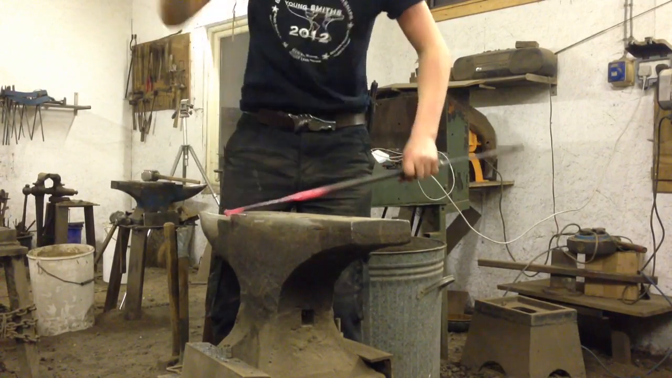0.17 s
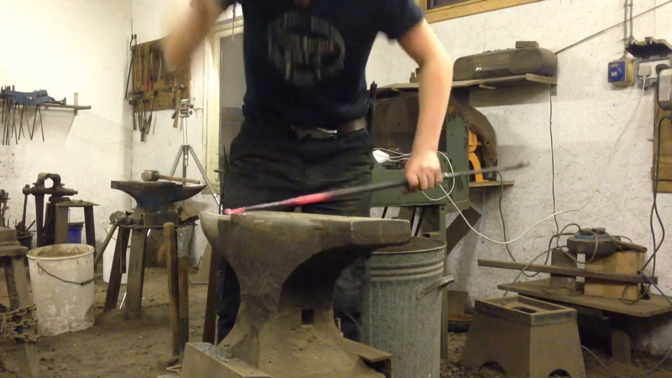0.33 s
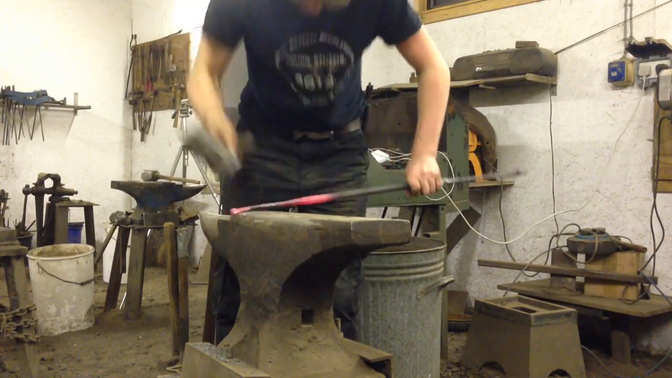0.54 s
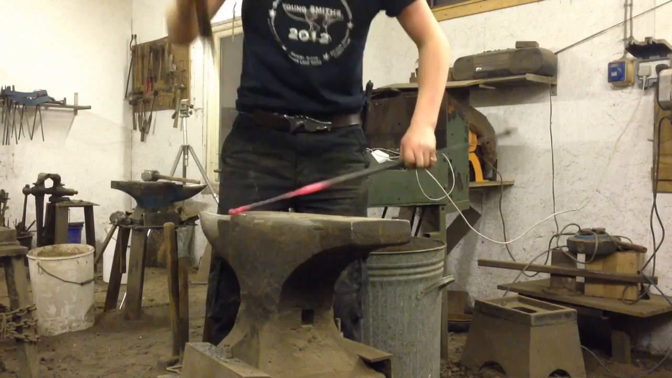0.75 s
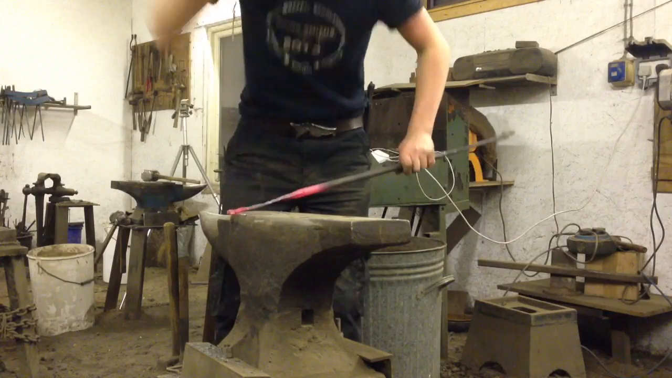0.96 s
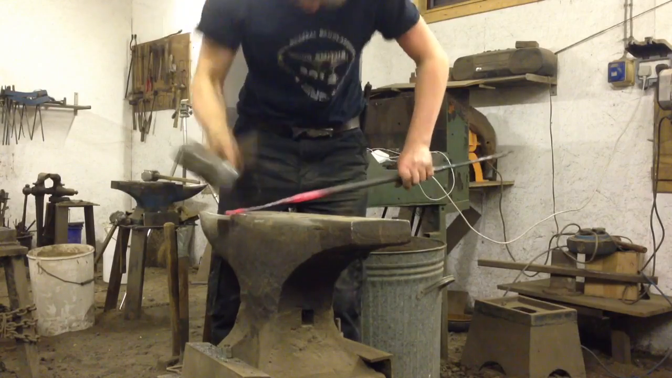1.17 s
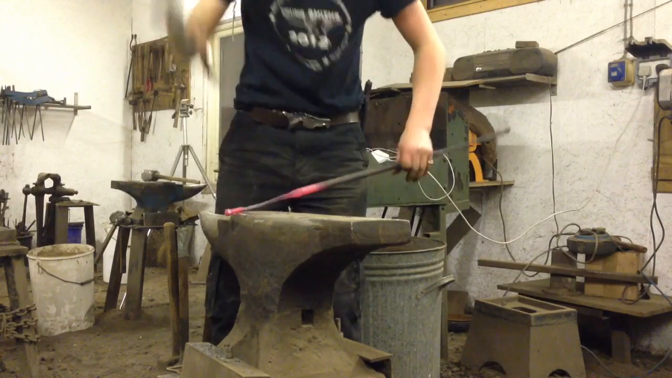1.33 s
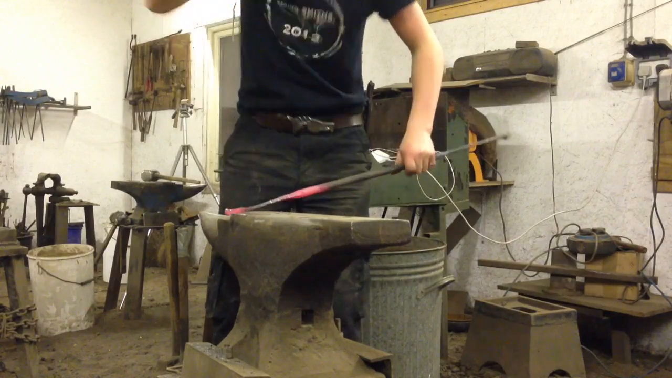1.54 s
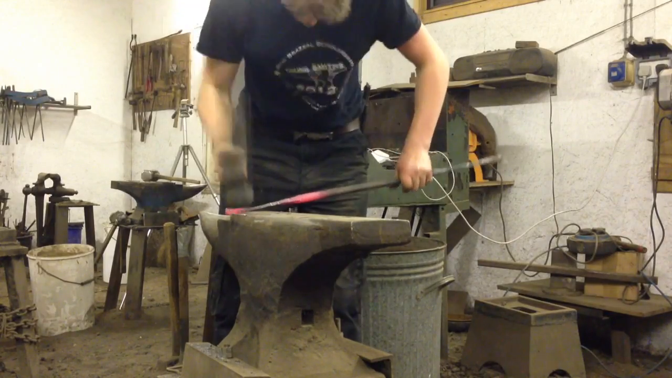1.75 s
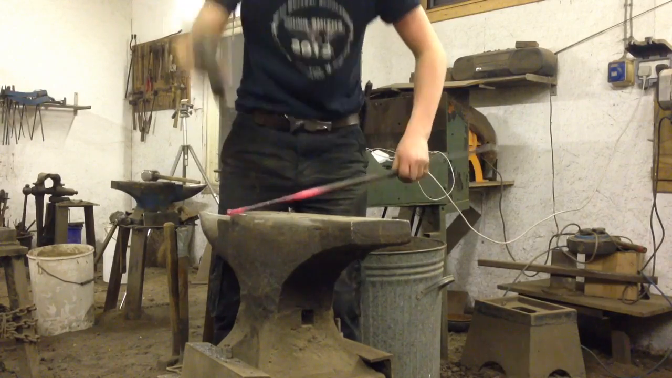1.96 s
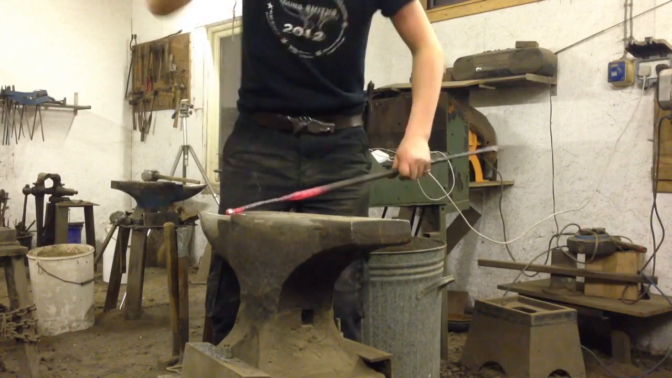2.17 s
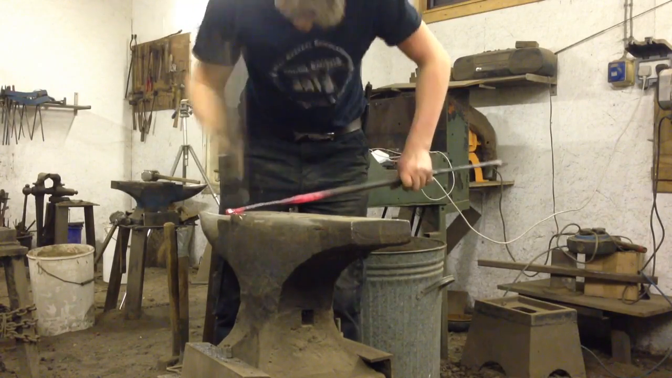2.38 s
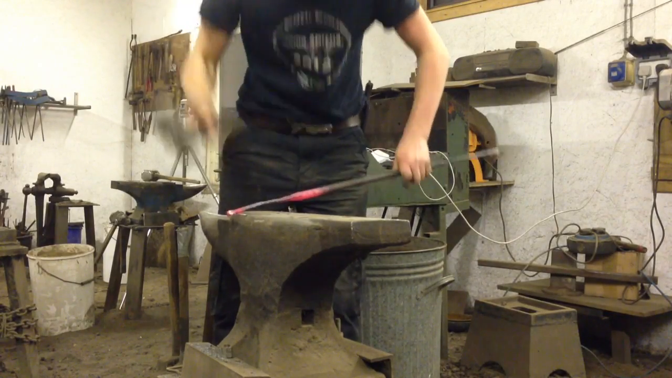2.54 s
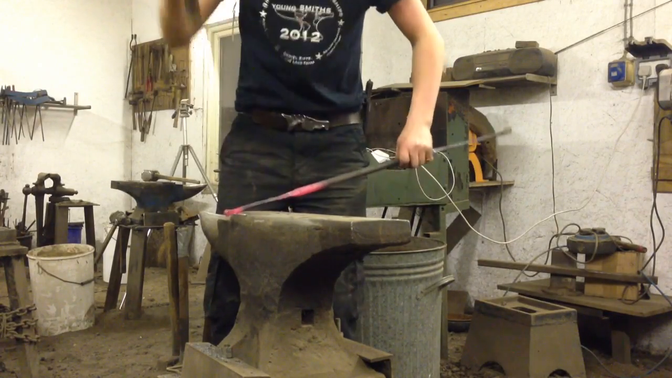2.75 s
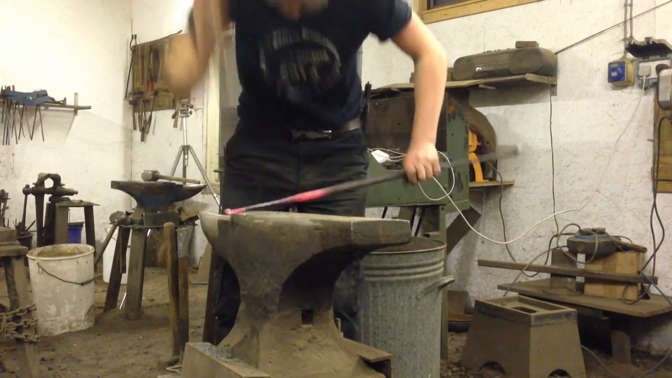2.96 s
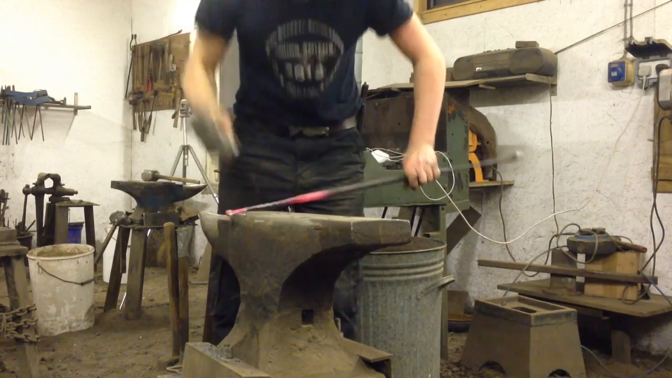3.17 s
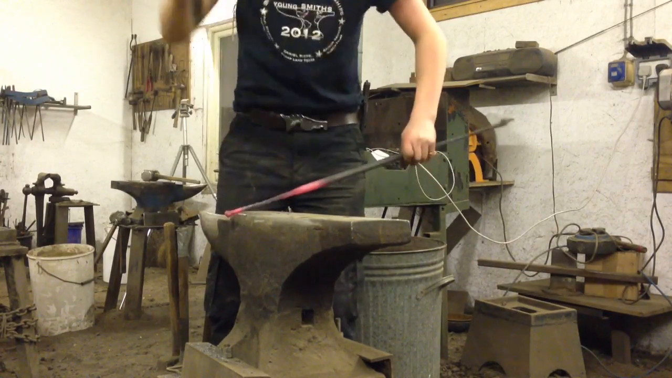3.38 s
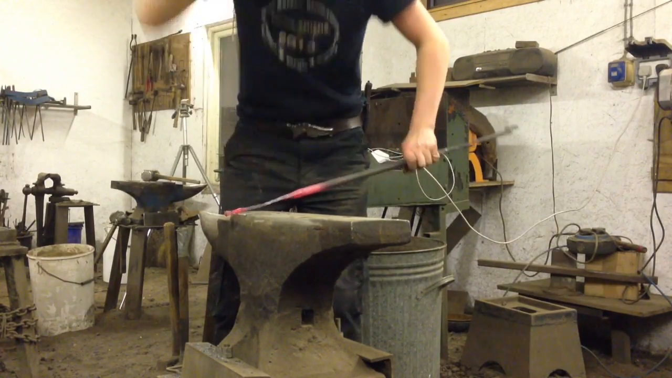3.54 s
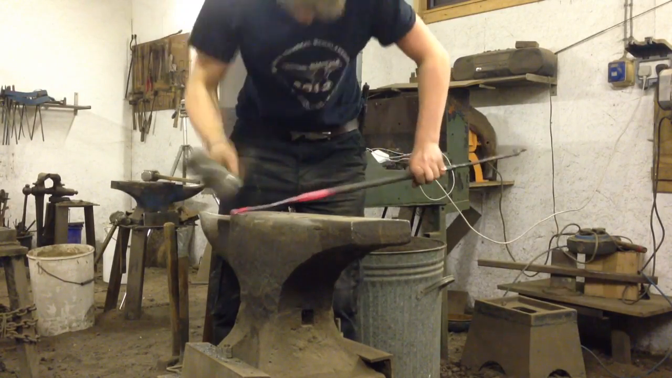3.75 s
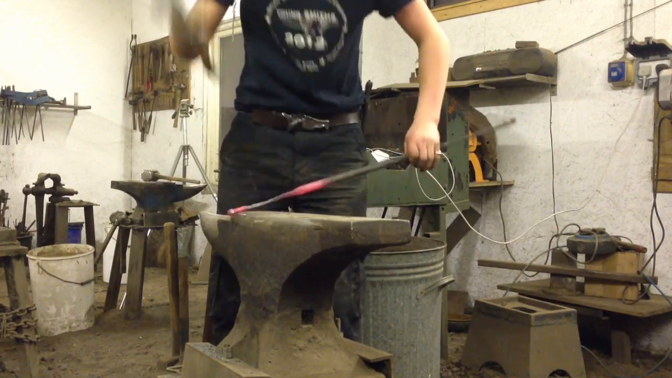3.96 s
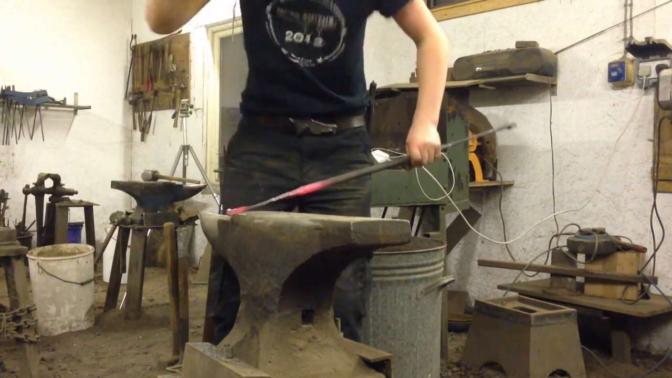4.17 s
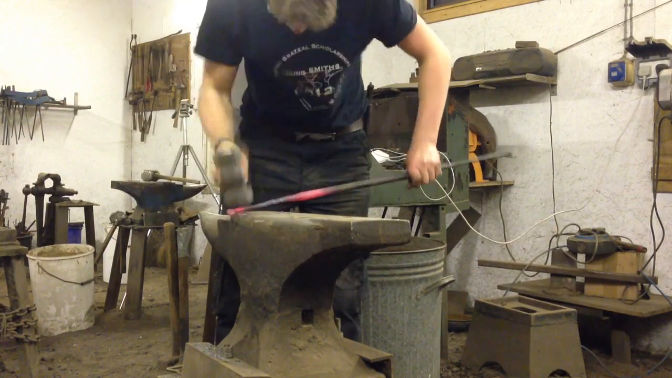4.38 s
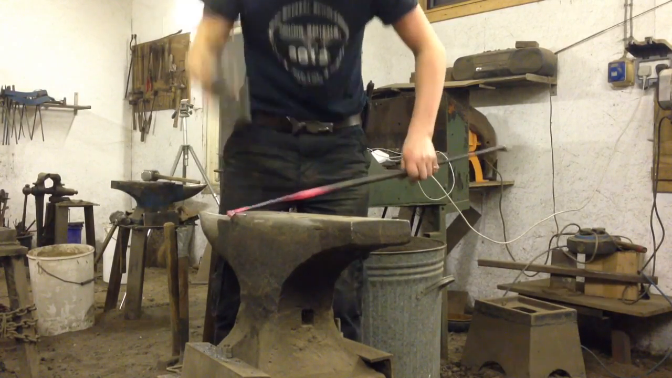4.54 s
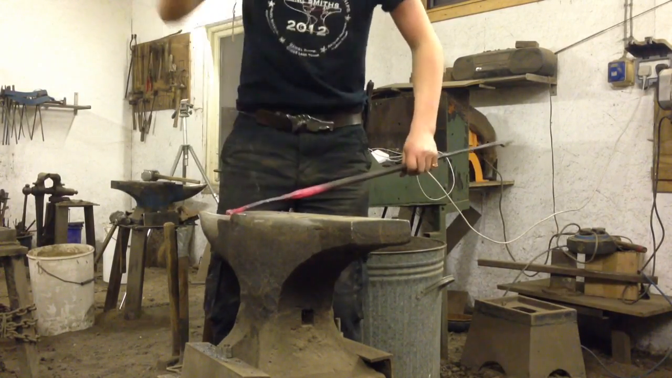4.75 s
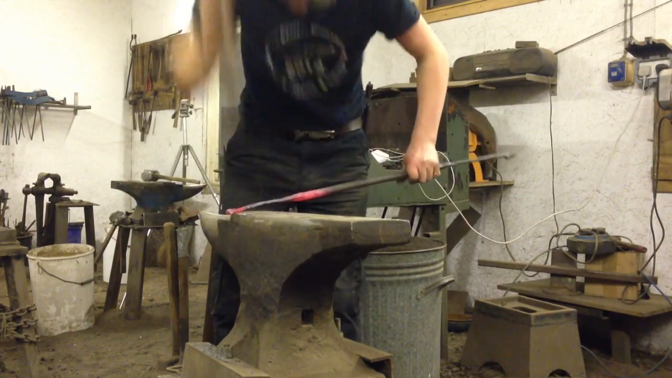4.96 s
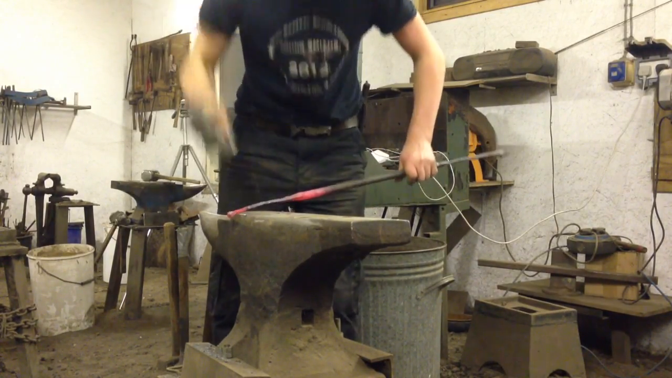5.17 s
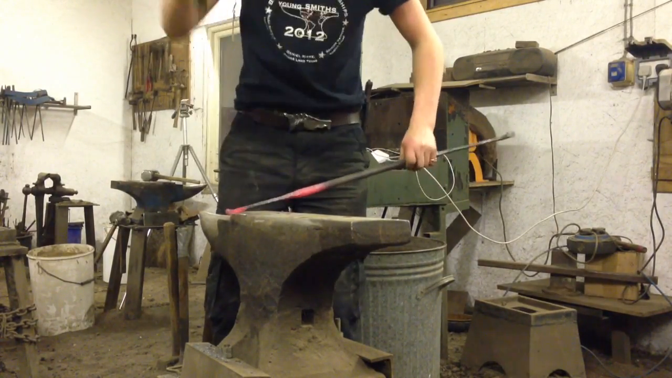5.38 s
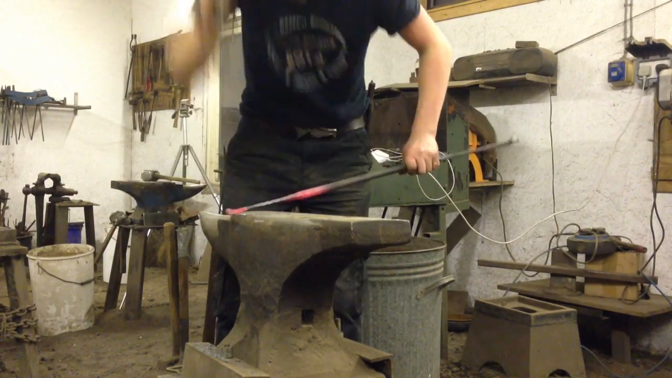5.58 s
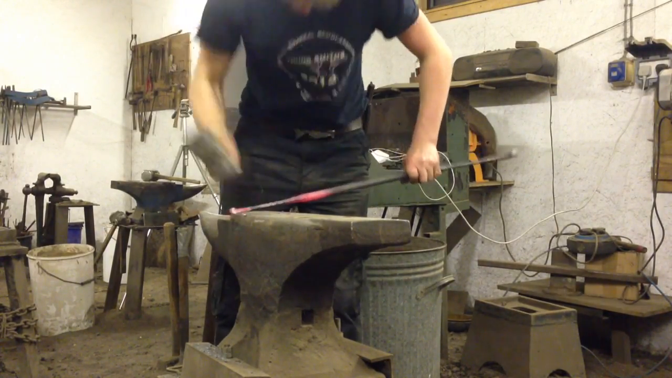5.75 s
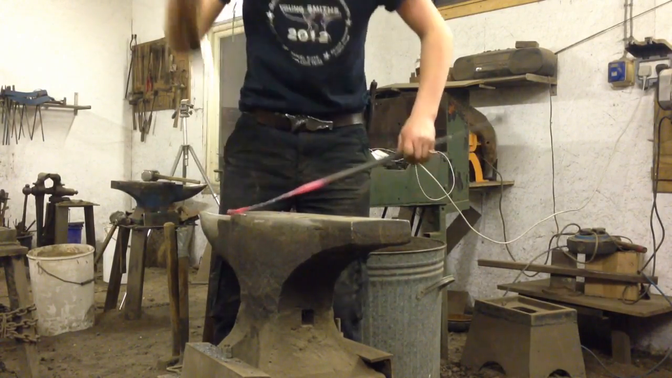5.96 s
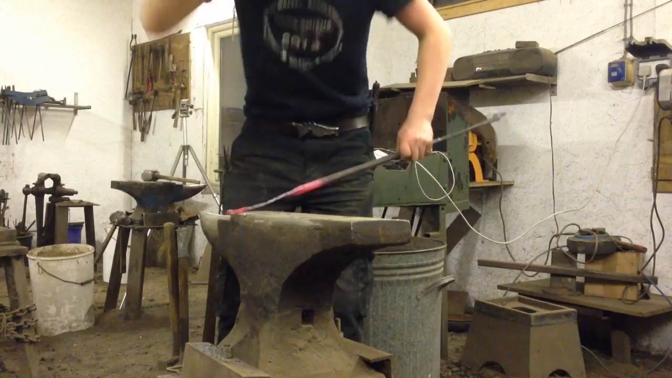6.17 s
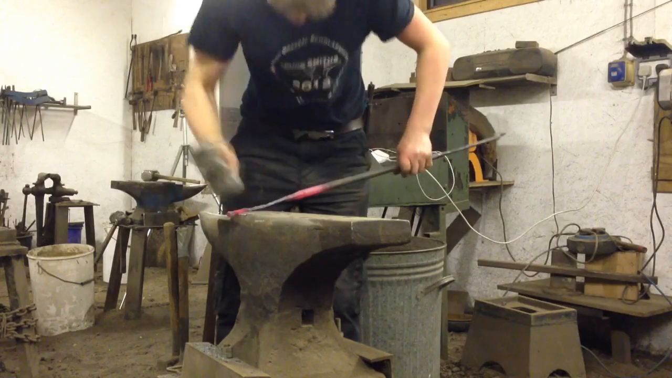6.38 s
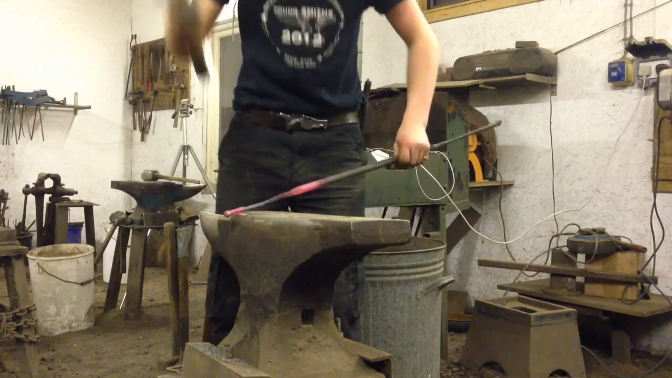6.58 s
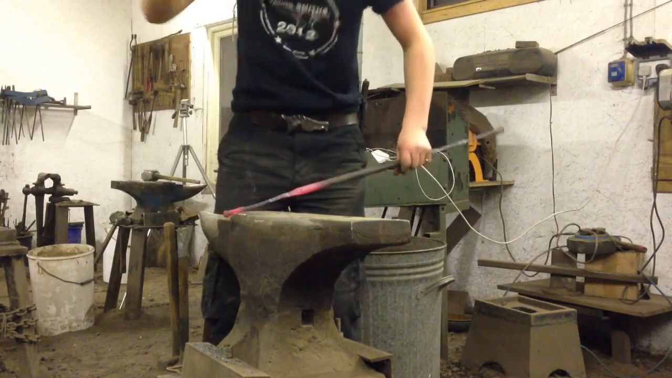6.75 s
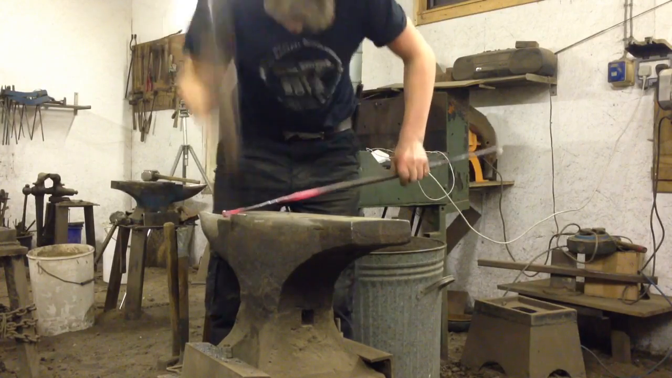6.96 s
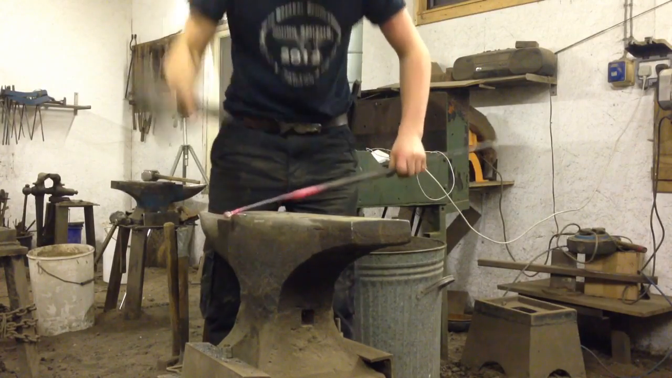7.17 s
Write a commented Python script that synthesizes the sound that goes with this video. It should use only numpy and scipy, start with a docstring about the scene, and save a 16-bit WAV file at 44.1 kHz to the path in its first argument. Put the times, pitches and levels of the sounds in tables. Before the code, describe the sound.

The sound opens on the fading ring of a hammer blow on an anvil in a small workshop. At about 0.6 seconds the next blow lands on the hot steel bar: a sharp crack, a dull clank and a short, bright metallic ring, with a brief echo from the walls. The blows continue evenly, one every two thirds of a second, at roughly 1.2, 1.9, 2.5, 3.2, 3.8, 4.5, 5.1, 5.8 and 6.4 seconds, with a last one at 7.1, right at the end. Their strength is similar, the one at 2.5 a little lighter, and the ring shifts in tone from hit to hit. In the gaps the bar and its scale tick faintly on the anvil, most clearly near 1.5 seconds. A very quiet rumble and hiss of forge fire and a blower's hum run underneath. Each hit sounds slightly compressed.

```python
"""A small workshop, a smith already hammering a hot steel bar on an anvil: we come in on a blow's tail.
Faint ticks and the hum and hiss of the forge fill the gap. Then the next blow lands: a crack, a dull
clank and a short ring that the soft steel damps, and the walls throw it back. Automatic gain flattens
each hit and creeps back up before the next. So it goes on to the end, a blow every two thirds of a second."""
import sys
import numpy as np
from scipy import signal
from scipy.fft import rfft, irfft, next_fast_len
from scipy.io import wavfile
from scipy.ndimage import uniform_filter1d

SR = 44100
rng = np.random.default_rng(int(sys.argv[2]) if len(sys.argv) > 2 else 0)


def transcribe(signal):
    """Save signal, clipped to [-1, 1], as a 16-bit WAV file at the path in sys.argv[1]."""
    frames = np.atleast_2d(signal).T
    limited = np.clip(frames, -1, 1)
    pcm = np.round(limited * 32767).astype(np.int16)
    wavfile.write(sys.argv[1], SR, pcm)


N = 318402
LEAD = SR // 4  # samples of pre-roll, room for the opening blow
AGE = np.arange(int(.6 * SR)) / SR  # seconds since a hit

# drift of the fire's rush: t/s, level/dB
FIRE_DRIFT = [(.3, -1), (1.65, 2), (2.3, 0), (3.6, -.5), (4.9, 1.9), (5.6, 2), (6.2, 0), (7.1, 0)]
# hum of the forge blower: f/Hz, level/dB
BLOWER_HUM = [(102, -66), (190, -68), (333, -68), (409, -73)]
# tone curves of the fire, a tick, the walls' echo and the contact crack: f/Hz, level/dB
FIRE_TONE = [(15, -56), (25, -17.5), (64, -9), (90, 3.5), (125, -7), (191, 2.5), (243, -2.5), (404, -5.5),
             (475, -9.5), (529, -9.5), (709, -17), (811, -15.5), (1120, -22.5), (3830, -21), (15000, -46)]
TICK_TONE = [(100, -22), (1000, -9), (3500, 0), (7000, -1), (12000, -7), (15000, -15)]
ECHO_TONE = [(30, -26), (90, -11.5), (200, -12), (330, -7.5), (520, 0), (680, -5), (900, -1), (1600, 2),
             (2350, -7.5), (3100, -1), (5000, -5), (8000, -7), (10500, -14), (15000, -23)]
CRACK_TONE = [(30, -44), (170, -29.5), (400, -11.5), (1000, 6), (1600, 2), (2400, 3), (3200, 2), (4800, -4),
              (8300, -0.5), (11500, -8.5), (12500, -14.5), (15000, -10)]
# reverb time of the workshop: f/Hz, t60/s
ROOM_DECAY = [(80, 0.51), (300, 0.19), (700, 0.3), (1500, .29), (3000, 0.27), (6000, 0.24), (10000, 0.18),
              (15000, 0.18)]
# the clearest ticks of the bar and its scale on the anvil: t/s, level/dB
TICK_CUES = [(.3223, -45), (.8352, -51), (1.5491, -36.5), (3.0326, -45), (3.119, -44), (3.7256, -45.5),
             (4.1407, -47), (5.452, -44), (6.853, -47)]
# heavily damped modes of anvil, stand and floor: f/Hz, level/dB, t60/s
THUD_MODES = [(100.1, -36, 0.18), (290.7, -9, 0.023), (409, -2.5, 0.02), (504, -7.5, 0.027),
              (824, -9, 0.048), (1270, -6, 0.016), (1585, 1, 0.012), (1907, -5, 0.038)]
# ringing modes of the dull clank, the anvil, the bar and the hammer head: f/Hz, level/dB, t60/s
CLANK_MODES = [(336, -21.5, .22), (370, -17.5, .2), (559, -24, .22), (596, -21.5, .24), (809, -21.5, .24),
               (968, -19.5, .26), (1275, -22, .26), (1503, -21, .32), (1578, -16, .28), (1801, -23, .25),
               (2101, -22, .2)]
ANVIL_MODES = [(2841, -19, .21), (2975, -21.5, .19), (3015, -14, .22), (3060, -9.5, .23), (3120, -22, .19)]
BAR_MODES = [(3494, -25, .2), (3589, -19, .24), (3907, -17.5, .21), (4230, -25, .22), (5265, -27.5, .22),
             (6050, -23, .2), (11468, -28, .14)]
HAMMER_MODES = [(14000, -49, .5)]
# the blows; where each lands decides what rings: t/s, force/dB, brightness/dB, anvil ring/dB, bar ring/dB
BLOW_CUES = [(-0.088,-9.5,-1,4,-3), (0.564,-1.1,-2.5,-3,7.5), (1.214,-1.5,-4,3.5,-5), (1.869,-1.5,0,7.5,7),
             (2.5038,-5,-1.5,4.5,-26), (3.1533,-3.5,2,-10,9), (3.8129,-1,-1,2.5,-3.5), (4.4808,-0.3,1,1,-1),
             (5.1446,-2.5,-1,6.5,3), (5.794,-1.5,1.9,5.5,6.5), (6.444,-2.2,-2.5,8,4),
             (7.102,-0.7,-2.5,2,2.5)]


def amp(db):
    """Decibels to gain."""
    return 10 ** (np.asarray(db) / 20)


def unit_rms(x):
    """Scales to rms 1."""
    return x / np.sqrt(np.mean(abs(x) ** 2) + 1e-20)


def curve_at(points, hz):
    """Reads a curve on a log-frequency axis."""
    f, value = np.transpose(points)
    return np.interp(np.log(hz + 1), np.log(f + 1), value)


def place(track, s, sound):
    """Drops a sound at time s on a track with pre-roll."""
    part = track[round(s * SR) + LEAD:][:len(sound)]
    part += sound[:len(part)]


def coloured(noise, tone, bright_db=0):
    """EQs noise to a tone curve at rms 1, then shelves its treble up or down."""
    hz = np.fft.rfftfreq(len(noise), 1 / SR)
    shaped = unit_rms(irfft(rfft(noise) * amp(curve_at(tone, hz)), len(noise)))
    shelf = amp(bright_db * hz ** 2 / (hz ** 2 + 3500 ** 2))
    return irfft(rfft(shaped) * shelf, len(noise))


def waver(size, width_hz):
    """A slow wobble of level and phase: complex noise at rms 1."""
    hz = np.fft.fftfreq(size, 1 / SR)
    noise = rng.standard_normal(size) + 1j * rng.standard_normal(size)
    return unit_rms(np.fft.ifft(np.fft.fft(noise) * np.exp(-(hz / width_hz) ** 2)))


def forge():
    """The bed: the fire's rumble and hiss drift together over the blower's wavering hum."""
    t = np.arange(-LEAD, N) / SR
    padded = next_fast_len(len(t))
    rush_db = -55 + np.interp(t, *np.transpose(FIRE_DRIFT))
    rush = amp(rush_db) * coloured(rng.standard_normal(padded), FIRE_TONE)[:len(t)]
    rumble = signal.sosfiltfilt(signal.butter(2, 700, fs=SR, output="sos"), rush)
    hiss = rush - rumble
    hum = np.zeros(len(t))
    for hz, db in BLOWER_HUM:
        wobble = 1 + waver(padded, width_hz=4.1)[:len(t)]
        hum += amp(db) * (wobble * np.exp(2j * np.pi * hz * t)).real
    return amp(-3) * rumble + amp(5.5) * hiss + hum


def room_tail(noise, build_s):
    """Turns noise into reverb: it builds up, then each band dies at its own speed."""
    hz, t, bands = signal.stft(noise, SR, nperseg=256)
    decay = amp(-60 * t / curve_at(ROOM_DECAY, hz)[:, None])
    tail = signal.istft(bands * decay, SR, nperseg=256)[1][:len(AGE)]
    return tail * (1 - np.exp(-(AGE / build_s) ** 2))


def burst(rise_s, length_s):
    """The envelope of a contact: fast attack, short hold, fast release."""
    return (1 - np.exp(-AGE / rise_s)) * np.exp(-(AGE / length_s) ** 2)


def ticks():
    """Bar and scale snap on the anvil, each with a faint tail; 14 softer ticks fall at random."""
    out = np.zeros(LEAD + N)
    faint = rng.uniform((0, -57), (N / SR, -49), (14, 2))  # t/s, level/dB
    for s, db in [*TICK_CUES, *faint]:
        contact, echo = rng.standard_normal((2, len(AGE)))
        snap = coloured(contact, TICK_TONE) * burst(rise_s=.0002, length_s=.0018)
        tail = amp(-15) * room_tail(coloured(echo, TICK_TONE), build_s=.004)
        place(out, s, amp(db) * (snap + tail))
    return out


def overtones(level_db, droop_db, count):
    """The shimmer of weak high modes a blow wakes: fainter toward the top, as long as the room's tail."""
    hz = np.linspace(2300, 13500, count) + 200 * rng.uniform(-1, 1, count)
    scatter, phase = rng.standard_normal((count, 2)).T
    db = level_db - droop_db * np.log2(hz / hz[0]) ** 2 + 2 * scatter
    t = AGE[:, None]
    decay = amp(db - 60 * t / curve_at(ROOM_DECAY, hz))
    return (decay * np.sin(2 * np.pi * (hz * t + phase))).sum(1)


def thud(push_s):
    """The body of the hit: the hammer pushes on soft steel; anvil and stand give a few damped cycles."""
    swings = sum((-1) ** k * amp(db - 60 * AGE / t60) * np.sin(2 * np.pi * hz * AGE)
                 for k, (hz, db, t60) in enumerate(THUD_MODES))
    return swings * (1 - np.exp(-AGE / push_s))


def ring(modes, blow_db, swell_s, flutter, scatter_db, twin=0, beat_hz=0):
    """Ringing steel, a row per blow. A close twin makes a mode beat; reflections swell and flutter it."""
    out = np.zeros((len(blow_db), len(AGE)))
    swell = 1 - np.exp(-AGE / swell_s)
    beat = 1 - twin * np.exp(2j * np.pi * beat_hz * AGE)
    for hz, db, t60 in modes:
        smooth = amp(-60 * AGE / t60) * swell * beat
        shared_paths = waver(len(AGE), width_hz=35)
        own_paths = np.array([waver(len(AGE), width_hz=57) for _ in blow_db])
        envelope = smooth * (1 + flutter * (shared_paths + own_paths))
        # flutter reshapes the ring but keeps its energy
        envelope *= np.linalg.norm(smooth) / np.linalg.norm(envelope, axis=1, keepdims=True)
        scatter, phase = rng.standard_normal((len(blow_db), 2)).T[:, :, None]
        gain = amp(db + blow_db[:, None] + scatter_db * scatter)
        out += gain * (envelope * np.exp(2j * np.pi * (hz * AGE + phase))).real
    return out


def hammering():
    """The main hits: thud and crack of contact, ringing steel, and the room's answer."""
    out = np.zeros(LEAD + N)
    times, force_db, bright_db, anvil_db, bar_db = np.transpose(BLOW_CUES)
    head_db = 3.5 - 5 * amp(bar_db)  # the more the bar rings, the less the hammer head does
    clank = ring(CLANK_MODES, np.zeros(len(times)), swell_s=.00088, flutter=.72, scatter_db=.5)
    anvil = ring(ANVIL_MODES, anvil_db, swell_s=.016, flutter=.43, scatter_db=.7, twin=.6, beat_hz=12)
    bar = ring(BAR_MODES, bar_db, swell_s=.0031, flutter=.84, scatter_db=1)
    head = ring(HAMMER_MODES, head_db, swell_s=.001, flutter=.1, scatter_db=1)
    steel = clank + anvil + bar + head
    walls = rng.standard_normal(len(AGE))  # the echo pattern that all blows share
    for s, force, bright, ringing in zip(times, force_db, bright_db, steel):
        contact, scatter = rng.standard_normal((2, len(AGE)))
        crack = coloured(contact, CRACK_TONE, bright) * burst(rise_s=.0019, length_s=.0043)
        shimmer = amp(bright) * overtones(level_db=-23, droop_db=1.7, count=30)
        echo = coloured(walls + .6 * scatter, ECHO_TONE, bright)
        room = amp(-5.5) * room_tail(echo, build_s=.0057)
        # a light blow cracks almost as sharply as a heavy one, but rings less
        attack = amp(.094 * force) * (thud(push_s=.0025) + crack)
        tail = amp(force) * (ringing + shimmer + room)
        place(out, s, attack + tail)
    return out


def scene():
    """The mono mix, pre-roll trimmed so the work is already under way."""
    return (hammering() + ticks() + forge())[None, LEAD:]


def limiter(x, threshold_db, release_db_per_s, attack_s, share=1):
    """Ducks by a share of the excess just after a hit begins, then releases at a steady rate."""
    power_db = 10 * np.log10(abs(uniform_filter1d(x ** 2, size=128)) + 1e-12)
    wanted_db = share * np.maximum(power_db - threshold_db, 0)
    release_db = np.arange(len(x)) * release_db_per_s / SR
    duck_db = np.maximum.accumulate(wanted_db + release_db) - release_db
    lag = np.exp(-1 / (attack_s * SR))
    return x / amp(signal.lfilter([1 - lag], [1, -lag], duck_db))


def record(dry):
    """The master chain: slow automatic gain, a fast limiter, soft clipping, then a high cut."""
    makeup_db, ceiling, high_cut_hz = 3, .72, 15280
    ducked = limiter(dry[0], threshold_db=-46.5, release_db_per_s=9, attack_s=.0017, share=.13)
    limited = limiter(amp(makeup_db) * ducked, threshold_db=-12, release_db_per_s=55, attack_s=.001)
    clipped = ceiling * np.tanh(limited / ceiling)
    high_cut = signal.firwin(511, high_cut_hz, window=("kaiser", 9), fs=SR)
    return signal.oaconvolve(clipped, high_cut, "same")[None]


dry = scene()
out = record(dry)
transcribe(out)
```